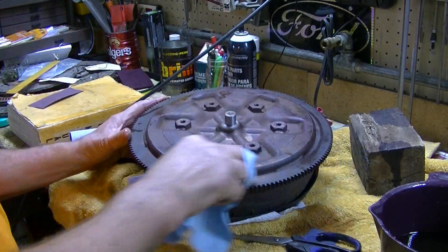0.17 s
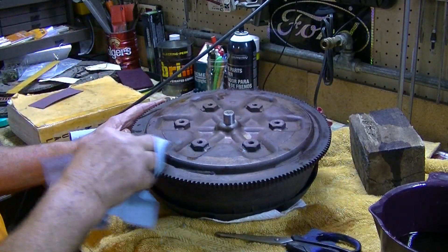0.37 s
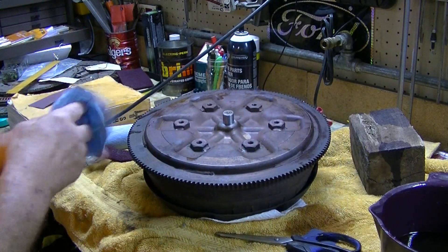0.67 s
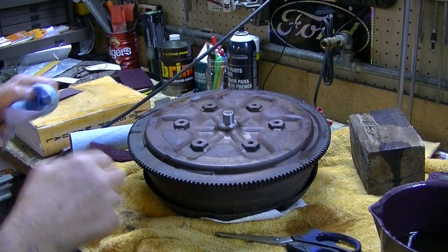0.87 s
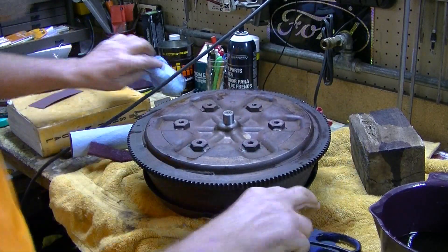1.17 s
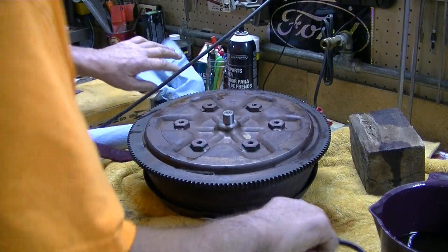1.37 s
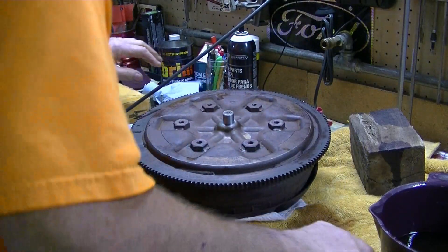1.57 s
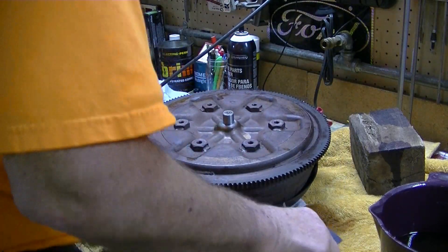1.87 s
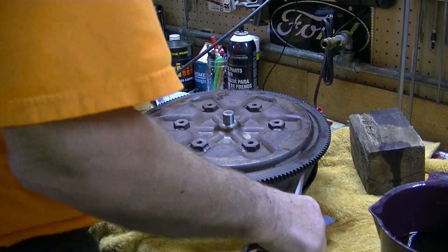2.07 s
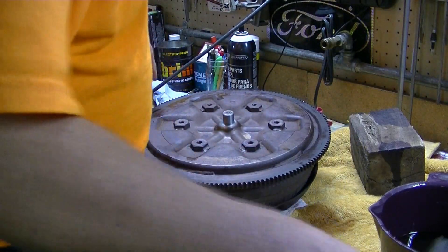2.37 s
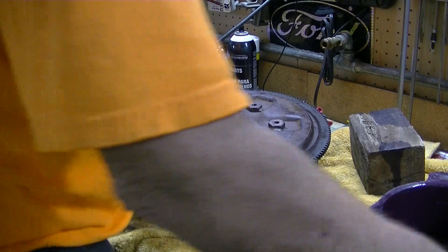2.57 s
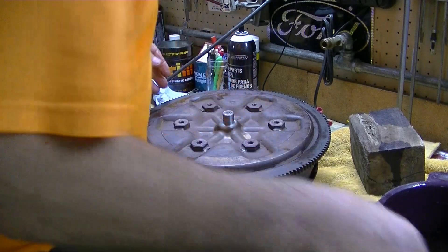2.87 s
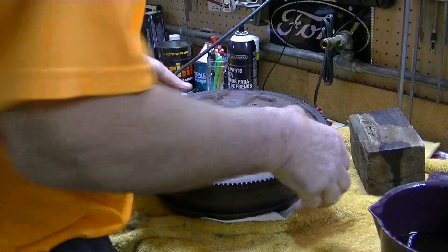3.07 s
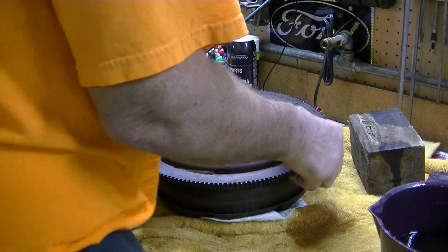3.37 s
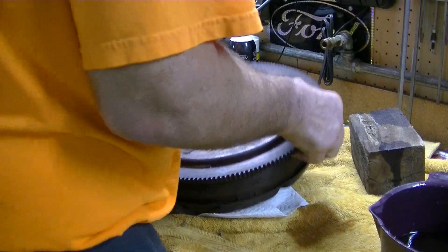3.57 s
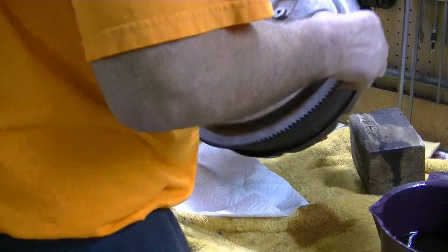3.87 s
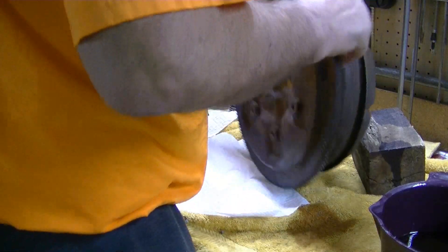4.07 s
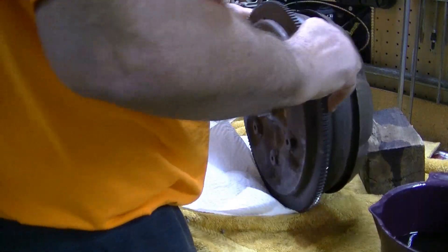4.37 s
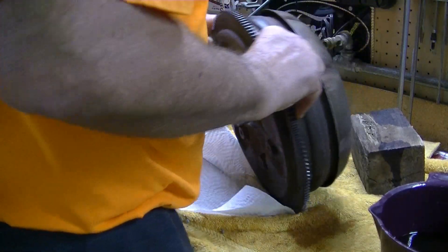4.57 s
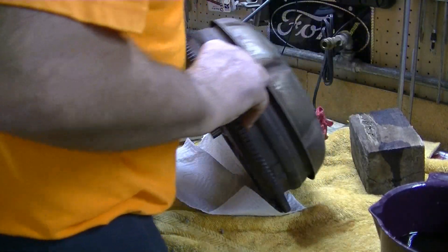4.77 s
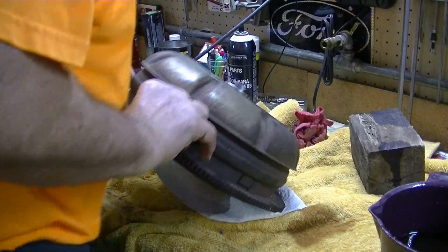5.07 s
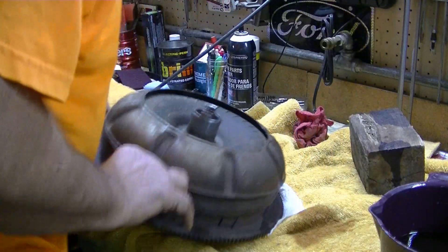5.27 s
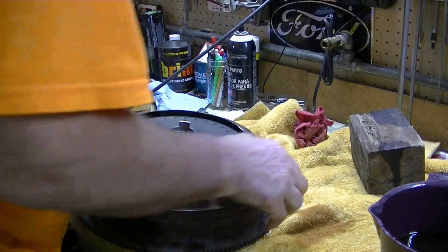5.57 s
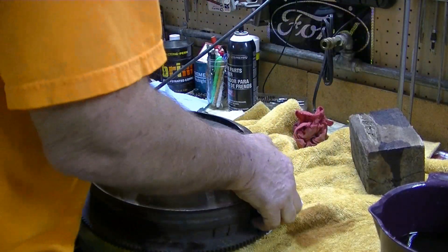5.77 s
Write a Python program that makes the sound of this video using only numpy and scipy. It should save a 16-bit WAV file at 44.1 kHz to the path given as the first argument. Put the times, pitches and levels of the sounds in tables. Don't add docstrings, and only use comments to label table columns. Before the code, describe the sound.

Quiet cloth strokes in a garage, one sharp scissor snip and clatter, then a hard toothed metal clank with rapid rattling and small clinks.

```python
import sys
import numpy as np
from scipy import signal
from scipy.fft import rfft, irfft, next_fast_len
from scipy.io import wavfile
from scipy.ndimage import uniform_filter1d

SR = 44100
rng = np.random.default_rng(int(sys.argv[2]) if len(sys.argv) > 2 else 0)


def to_linear_factor(level_db):
    exponent = np.asarray(level_db, float) / 20
    return 10 ** exponent


def wav_record(signal):
    frames = np.transpose(np.atleast_2d(signal))
    bounded = np.clip(frames, -1, 1)
    quanta = np.round(bounded * 32767).astype(np.int16)
    wavfile.write(sys.argv[1], SR, quanta)


N = 260190

# (frequency [Hz], level [dB], t60 [s])
RIM_MODES = [(2680, -15, .06), (3280, -14, .06), (4090, -2, .06), (4400, -6, .06), (4780, -4, .055),
             (5270, -5, .06), (5920, 0, .06), (6170, -3, .05), (6650, -8, .06), (7400, -15, .05),
             (8050, -17, .04), (9400, -10, .055), (10200, -17, .035), (12150, -20, .03)]
# (frequency [Hz], level [dB], t60 [s])
PLATE_MODES = [(1520, -14, .1), (2270, -8, .09), (2560, -8, .08), (3200, -8, .06), (3700, -7, .06),
               (4450, -1, .06), (5100, -9, .05), (5900, -1, .06), (7360, -9, .05), (8900, -17, .04),
               (10000, -15, .05), (11500, -19, .04), (12500, -19, .04)]
# (frequency [Hz], width [Hz], level [dB])
BENCH_BODY = [(143, 34, 1), (290, 26, 2), (1140, 650, 0)]
# (frequency [Hz], width [Hz], level [dB])
TUB_BODY = [(201, 13, -9.5), (337, 10, -5), (1000, 76, -2), (1340, 170, -8)]
# (time [s], peak level [dB], centre [Hz])
TEETH = [
    (4.3301, -17.5, 4000),
    (4.3728, -10.5, 6300),
    (4.4205, -14.5, 4900),
    (4.4911, -11.5, 5600),
    (4.5485, -21, 4960),
    (4.5836, -24, 4220),
    (4.6147, -22.5, 5800),
    (4.6299, -27.5, 5800),
]


def unit(x):
    return x / np.sqrt(np.mean(x ** 2) + 1e-20)


def along(points, hz):
    f, v = np.transpose(points)
    return np.interp(np.log(hz + 1), np.log(f + 1), v)


def filtered(x, response):
    n = x.shape[-1]
    m = next_fast_len(n + 3000, True)
    return irfft(rfft(x, m) * response(np.fft.rfftfreq(m, 1 / SR)), m)[..., :n]


def thin(x):
    return signal.sosfilt(signal.butter(N=7, Wn=1220, btype="high", fs=SR, output="sos"), x)


def add(track, s, x):
    part = track[..., round(s * SR):][..., :x.shape[-1]]
    part += x[..., :part.shape[-1]]


def spread(pair, alike):
    def turn(hz):
        return np.arccos(np.clip(along(alike, hz), -1, 1)) / 2

    mid, side = filtered(pair, lambda hz: np.array([np.cos(turn(hz)), np.sin(turn(hz))]))
    return np.array([mid + side, mid - side])


def attack(t, rise):
    return 1 - np.exp(-t / rise)


def peak(f, hz, width):
    return 1j * f * width / (hz * hz - f * f + 1j * f * width)


def resonator(modes, db=0, detune=1):
    centre, level, life = np.transpose(modes)[:, :, None]
    width = np.log(1000) / np.pi / life
    return lambda f: np.sum(to_linear_factor(level + db) * peak(f, centre * detune, width) * 500 / width, 0)


def ring(modes, t, spread_db):
    hz, db, t60 = np.transpose(modes)[:, :, None]
    size, phase = rng.standard_normal((2, len(modes), 1))
    decay = to_linear_factor(db + spread_db * size - 60 * t / t60)
    return np.sum(decay * np.sin(2 * np.pi * hz * t + phase), 0) * attack(t, 0.00018)


def scrape(t, hz, t60, tilt_db, rise, modes=(), ring_db=-9, hold=0):
    # (frequency [Hz], density [dB per Hz])
    steel_colour = [(290, -27.5), (500, -24.5), (1400, -17.5), (1550, -8.5), (3490, -6), (3980, -5.5),
                    (5970, -5), (8580, -10.5), (9490, -8), (12300, -17.5), (16000, -56)]
    roughness = unit(uniform_filter1d(rng.standard_normal(len(t)), size=30))
    grit = rng.standard_normal((2, len(t))) * to_linear_factor(2.5 * roughness)
    shape = to_linear_factor(-60 * np.maximum(t - hold, 0) / t60) * attack(t, rise)

    def lean(f):
        return to_linear_factor(tilt_db * np.log2((f + 300) / 5000)) * (1 + 2.46 * peak(f, hz, 0.6 * hz))

    burst = unit(filtered(grit, lambda f: to_linear_factor(along(steel_colour, f)) * lean(f))) * shape
    if not len(modes):
        return burst
    size, shift, split = rng.standard_normal((3, len(modes), 1))
    first = resonator(modes, 2 * size, 1 + 0.005 * shift)
    second = resonator(modes, 2 * size, 1 + 0.005 * shift + 0.012 * split)
    return burst + to_linear_factor(ring_db) * filtered(grit * shape, lambda f: (first(f) + second(f)) * lean(f))


def blows(events, modes, stand, rise, ring_db, tilt_db, thud_db, hold=0):
    sound, knocks, t = np.zeros((2, N)), np.zeros(N), np.arange(SR // 6) / SR
    for s, db, hz, t60 in events:
        blunt = np.log2(4500 / hz)
        burst = scrape(t, hz, t60, tilt_db - 0.5 * blunt, rise, modes, ring_db, hold)
        add(sound, s, to_linear_factor(db - 8.5) * burst)
        add(knocks, s, to_linear_factor(db + thud_db + 10.5 * max(blunt, 0)) * np.hanning(16))

    def body(f):
        return sum((-1) ** k * to_linear_factor(db) * peak(f, hz, width) for k, (hz, width, db) in enumerate(stand))

    sound[0] += filtered(knocks, body)
    return sound


def rustle(patchy_db, grain_db):
    # (frequency [Hz], density [dB per Hz])
    cloth_colour = [(410, -57), (700, -23), (1250, -19), (1400, -14.5), (1500, -16), (1750, -10.5),
                    (1940, -11.5), (3320, -6.5), (4150, -2), (5920, 0.5), (7990, -17), (9350, -23.5),
                    (16000, -46)]
    # (time [s], level [dB], crispness [dB])
    movement = [(0, -40.5, 0), (.33, -42.5, 4.5), (0.479, -41.5, -0.5), (.565, -69.5, 0), (.68, -50, -5),
                (.8, -46, -4.5), (1.25, -53.5, -7.5), (1.5, -49.5, -3), (1.9, -57.5, 0), (2.13, -60, 0.5),
                (2.42, -67.5, -5), (2.93, -70, -0.5), (3.46, -58, -3.5), (4.09, -64.5, 3.5),
                (4.7, -49, -15.5), (5.05, -56, -5), (5.63, -61, -9), (5.9, -53, -8)]
    # (time of peak [s], level [dB], time to rise 10 dB [ms], time to fall 10 dB [ms])
    strokes = [(.432, -38.5, 102, 39), (.72, -42.5, 37, 31), (.82, -43.5, 39, 33), (.91, -42.5, 19, 67),
               (1.048, -43.5, 65, 12), (1.409, -38.5, 71, 21), (1.5, -43.5, 45, 130), (1.622, -42.5, 5, 57),
               (1.728, -45, 13, 9), (1.8, -46.5, 12, 71), (1.93, -49, 19, 42), (1.99, -46, 15, 35),
               (2.068, -49, -2, 56), (2.101, -40, 28, 27), (2.373, -53, 95, 12), (2.452, -48.5, 8, 8),
               (2.48, -51, 10, 16), (2.53, -51, 22, 45), (2.618, -35.5, 4.5, 80), (2.685, -41, 45, 31),
               (4.031, -47, 19, 77), (4.089, -39, 78, 105), (4.226, -43.5, 19, 30), (4.848, -47, 100, 32),
               (5.219, -46.5, 67, 129), (5.384, -42, 35, 33), (5.521, -48.5, 14, 37), (5.798, -45, 59, 152)]
    # (time [s], share [0-1])
    grind = [
        (4.66, .04),
        (4.76, .08),
        (4.95, .03),
        (5.2, .06),
        (5.5, .1),
        (5.9, .25),
    ]
    s, db, treble_db = np.transpose(movement)
    t = np.arange(N) / SR
    power = to_linear_factor(2 * np.interp(t, s, db))
    for at, level_db, rise, fall in strokes:
        away = np.maximum((at - t) / abs(rise), (t - at) / abs(fall)) * 1000
        power += to_linear_factor(2 * level_db - 20 * away)

    z = signal.stft(rng.standard_normal((2, N)), nperseg=256)[2]
    field = uniform_filter1d(rng.standard_normal(z.shape[1:]), size=5, axis=0)
    field = uniform_filter1d(field, size=9, axis=1)
    noise = signal.istft(z * to_linear_factor(patchy_db * unit(field)), nperseg=256)[1][:, :N]
    quick_slips = unit(uniform_filter1d(rng.standard_normal(N), size=60))
    slow_slips = unit(uniform_filter1d(rng.standard_normal(N), size=600))
    noise = noise * to_linear_factor(grain_db * (quick_slips + 1.9 * slow_slips))

    steel = np.clip(np.interp(t, *np.transpose(grind), left=0), 0, 1)
    cloth = unit(filtered(noise, lambda f: to_linear_factor(along(cloth_colour, f))))
    metal = unit(filtered(noise, resonator(PLATE_MODES)))
    rub = np.sqrt(1 - steel) * cloth + np.sqrt(steel) * metal
    top = filtered(rub, lambda f: 1 / (1 + (8200 / (f + 1)) ** 8))
    crisp = to_linear_factor(np.interp(t, s, treble_db) + 16.5)
    return np.sqrt(power) * (rub - top + crisp * top)


def port_hiss():
    # (frequency [Hz], density [dB per Hz])
    hiss_colour = [(15, -50), (25, -11), (97, -2.5), (134, 1), (312, 2), (387, -1.5), (551, -5.5),
                   (648, -9), (1090, -12), (2200, -5), (2960, -5), (5240, -10.5), (14700, -17.5),
                   (16400, -22)]
    # (frequency [Hz], left-right likeness [-1 to 1])
    hiss_alike = [(60, -0.41), (130, -0.42), (290, -0.58), (640, -0.29), (1410, -0.14), (3100, -0.097),
                  (6820, -0.16), (15000, 0.046)]
    noise = filtered(rng.standard_normal((2, N)), lambda f: to_linear_factor(along(hiss_colour, f)))
    return to_linear_factor(-57.5) * unit(spread(noise, hiss_alike))


def soften(x):
    return filtered(x, lambda f: 1 / (1 + 1j * f / 13000 - (f / 9500) ** 2))


def creases():
    # (time [s], peak level [dB], centre [Hz])
    crackles = [(0.208, -30, 3030), (0.4035, -32, 4830), (0.425, -41, 5910), (0.572, -43, 2760),
                (0.682, -31, 9500), (0.922, -34.5, 4340), (1.4075, -28.5, 5730), (1.4998, -37, 4490),
                (1.6152, -31.5, 6000), (1.7273, -27.5, 3970), (1.794, -40, 6350), (2.3648, -35, 5430),
                (2.514, -37, 4060), (2.6183, -54, 5980), (2.6438, -24.5, 5000), (3.255, -39, 6400),
                (3.5992, -37.5, 6000)]
    sound, t = np.zeros((2, N)), np.arange(SR // 20) / SR
    for s, db, hz in crackles:
        add(sound, s, to_linear_factor(db - 7.5) * scrape(t, hz, t60=0.039, tilt_db=-2.5, rise=0.00054))
    return thin(soften(sound))


def hard_clicks():
    # (time [s], peak level [dB], centre [Hz])
    cracks = [(0.3538, -16.5, 5470), (1.9722, -28, 5000), (1.983, -30, 6000), (2.0636, -31, 6550),
              (2.0952, -23, 7000), (2.1009, -29, 7000), (2.1047, -28, 7600), (2.1713, -4, 5150),
              (3.442, -42, 6000), (1.7266, -30, 4500), (2.7432, -15, 5740), (2.7583, -6.5, 6330),
              (2.83, -3.5, 5870), (2.8463, -10, 5400), (2.884, -16, 5400), (4.2396, -5.5, 4500),
              (4.2402, -22, 4500), (4.2634, -3.5, 5800), (5.516, -36, 5030), (5.792, -41, 2500),
              (5.854, -35, 5040)]
    sound, t = np.zeros((2, N)), np.arange(SR // 5) / SR
    for s, db, hz in cracks:
        swing = np.sin(2 * np.pi * hz * t) * to_linear_factor(-60 * t / 0.0012)
        add(sound[0], s, to_linear_factor(db + 10.5) * swing * attack(t, 0.0001))
    return thin(soften(sound))


def focus_motor():
    # (start [s], end [s], first click [dB], tick [dB], thump [dB])
    runs = [
        (1.056, 2.103, -36.5, -42, -56),
        (2.355, 2.6, -86, -57, -74),
        (3.4078, 4.808, -30, -42, -52),
        (5.293, 5.888, -35, -42, -55.5),
    ]
    # (frequency [Hz], level [dB], t60 [s])
    lens_modes = [(1430, 1, 0.014), (1584, -1, 0.018), (1873, 3, 0.013), (2150, -2, 0.042),
                  (2540, 2, 0.0098), (2950, -1, 0.028), (3600, -9, 0.014)]
    # (frequency [Hz], level [dB], t60 [s])
    catch_modes = [(1420, -3, .045), (1570, -7, .015), (1868, -5, .03), (2010, -10, .03), (2650, 3, .018),
                   (3050, 1, .014), (3700, -11, .02), (4100, -15, .012)]
    # (frequency [Hz], level [dB], t60 [s])
    step_modes = [(1500, 0, .014), (1880, -12, .02), (2600, -4, .012), (3120, -9, .012)]
    frame_rate = 29.97
    ticks, thumps, t = np.zeros(N), np.zeros(N), np.arange(SR // 20) / SR
    whir = unit(filtered(rng.standard_normal(N), resonator(lens_modes)))
    for start, end, click_db, tick_db, thump_db in runs:
        add(ticks, start, to_linear_factor(click_db) * ring(catch_modes, t, spread_db=1) * attack(t, 0.0006))
        add(ticks, start, to_linear_factor(tick_db - 18) * whir[round(start * SR):round(end * SR)])
        for s in np.arange(start, end, 1 / frame_rate)[1:]:
            step = 1.5 * ring(step_modes, t, spread_db=1.5) * attack(t, 0.002)
            add(ticks, s + 0.0018 + rng.normal(0, 0.0004), to_linear_factor(tick_db + rng.normal(-1, 2.5)) * step)
            pitch_hz = 250 * np.exp(0.1 * rng.standard_normal())
            thump = np.sin(2 * np.pi * pitch_hz * t) * np.exp(-((t - 0.005) / 0.0025) ** 2)
            level_db = thump_db + np.clip(rng.normal(0, 3.2), -8, 3) - 0.5
            add(thumps, s + 0.0047 + rng.normal(0, 0.00048), to_linear_factor(level_db) * thump)
    return thin(ticks) + thumps


def scissors_picked_up():
    # (time [s], peak level [dB], centre [Hz], t60 [s])
    chatter = [
        (1.9718, -20, 4500, 0.0095),
        (1.9818, -27, 6500, 0.01),
        (1.992, -44, 5900, 0.025),
        (2.0632, -15.5, 6800, 0.0063),
        (2.077, -28, 4200, 0.036),
        (2.0835, -24, 7200, 0.016),
        (2.0945, -29, 7200, .012),
        (2.1007, -22, 7000, 0.012),
        (2.1035, -25.5, 4500, 0.02),
        (2.139, -31, 4400, 0.022),
    ]
    # (frequency [Hz], level [dB], t60 [s])
    loose_modes = [(3700, -2, .02), (4500, -3.5, 0.054), (5800, -14, .04), (7200, 5.5, 0.027),
                   (9030, -2.5, 0.034)]
    return thin(blows(chatter, loose_modes, TUB_BODY, rise=0.00021, ring_db=-12.5, tilt_db=-3.5, thud_db=-60))


def scissors_close():
    # (time [s], peak level [dB], grit t60 [s], ring level [dB])
    snips = [
        (2.171, -3, .022, -23.5),
    ]
    # (frequency [Hz], level [dB], t60 [s])
    blade_modes = [(1332, -23, .2), (2192, -18, .22), (2456, -18, .15), (3284, -4, .12), (3671, -8, .12),
                   (4511, -1, .1), (5401, -1, .12), (5641, -8, .12), (6401, -8, .08), (7501, -7, .05),
                   (8771, -13, .06)]
    sound, t = np.zeros((2, N)), np.arange(SR // 5) / SR
    for s, db, t60, ring_db in snips:
        other = ring(np.multiply(blade_modes, [1.011, 1, 1]), t, spread_db=2)
        blades = ring(blade_modes, t, spread_db=0) + 0.4 * other
        add(sound, s, to_linear_factor(db - 19) * scrape(t, 4500, t60, tilt_db=0.1, rise=0.001))
        add(sound[0], s, to_linear_factor(db + ring_db) * blades * attack(t, 0.002))
    return thin(sound)


def scissors_in_tub():
    # (time [s], peak level [dB], centre [Hz], t60 [s])
    bumps = [
        (2.6833, -10, 1300, 0.047),
        (2.695, -29, 805, 0.036),
        (2.814, -16.5, 1000, 0.059),
        (2.83, -28, 1000, 0.036),
    ]
    # (time [s], peak level [dB], centre [Hz], t60 [s])
    hits = [(2.7417, -19.5, 4260, 0.029), (2.75, -14, 5000, 0.053), (2.7535, -11, 6000, 0.044),
            (2.7563, -1, 4230, 0.031), (2.7639, -10, 3700, 0.045), (2.7685, -14.5, 4143, 0.18),
            (2.779, -24, 4000, 0.075), (2.7935, -20, 2800, 0.033), (2.7995, -11, 4200, 0.057),
            (2.8114, -13.5, 4130, 0.029), (2.8198, -21, 4400, 0.026), (2.8288, -4.5, 5800, 0.022),
            (2.8325, -8, 5000, .02), (2.8385, -21, 5000, 0.042), (2.843, -8, 5300, 0.024),
            (2.8465, -10, 5160, 0.031), (2.8515, -15, 5000, 0.036), (2.8645, -24, 5160, 0.037),
            (2.8833, -22, 5240, 0.062), (2.8988, -43, 5900, 0.11)]
    # (frequency [Hz], level [dB], t60 [s])
    clatter_modes = [(1880, -6.5, 0.064), (2700, 3.5, 0.025), (3986, 7, 0.025), (4970, -2, 0.045),
                     (5730, 6, 0.019), (6330, 5.5, 0.013), (7200, -17, .04), (9100, -11, 0.069)]
    handle = blows(bumps, clatter_modes, TUB_BODY, rise=0.00067, ring_db=-43, tilt_db=-1, thud_db=-13)
    clatter = blows(hits, clatter_modes, TUB_BODY, rise=0.00028, ring_db=-20.5, tilt_db=0, thud_db=-28)
    return clatter + filtered(handle, lambda f: 1 / (1 + 1j * f / 2200) ** 2)


def rim_lands():
    # (time [s], peak level [dB], centre [Hz], t60 [s])
    landing = [(4.2134, -28, 4000, .04), (4.2322, -11, 4970, 0.05), (4.2373, -2.5, 3620, 0.04),
               (4.2405, -8.5, 3600, 0.043), (4.2498, -14, 4800, 0.1), (4.2585, -12, 6150, 0.054),
               (4.2612, -13, 6170, 0.14), (4.2632, -0.5, 6100, 0.03), (4.27, -16, 3000, 0.045),
               (4.2887, -10.5, 5440, 0.064), (4.2985, -14, 5600, 0.035), (4.3075, -13, 4680, 0.04),
               (4.3188, -20, 6500, 0.061), (4.3385, -19.5, 4100, 0.062), (4.3475, -26, 4100, 0.041),
               (4.3957, -23, 5800, 0.12), (4.4048, -21, 5640, .08), (4.4175, -17, 4900, 0.04),
               (4.424, -20, 2010, 0.091), (4.442, -23, 5740, 0.058), (4.4505, -24, 5700, 0.23)]
    return blows(landing, RIM_MODES, BENCH_BODY, rise=0.00047, ring_db=-31, tilt_db=-3.5, thud_db=-11)


def lingering_tones():
    # (time [s], frequency [Hz], level [dB], t60 [s])
    boom = [
        (4.222, 62.4, -38, 0.32),
        (4.242, 83, -49, 0.71),
        (4.372, 74.3, -53, 0.55),
        (4.751, 69, -67, 0.91),
    ]
    # (time [s], frequency [Hz], level [dB], t60 [s])
    hum = [(4.331, 4100, -27, .09), (4.332, 2680, -33, .07), (4.44, 2650, -38, .1), (5.145, 1691, -59, .61),
           (5.379, 1691, -43, .5), (5.516, 3700, -48, .15), (5.378, 4400, -45, .12), (5.38, 6200, -44, .1),
           (5.2, 9300, -60, .4), (5.17, 7250, -58, .2), (5.8, 9200, -52, .08), (5.75, 4200, -50, .1),
           (5.559, 2400, -41, .07), (5.559, 4150, -38, .08), (5.559, 4650, -38, .06),
           (4.775, 3150, -57, .6), (4.78, 5400, -52, .1), (4.845, 4500, -52, .1), (5.615, 4450, -31, .12),
           (5.617, 5950, -32, .1), (5.625, 4600, -36, .08), (5.655, 4550, -42, .1), (5.636, 2100, -45, .2),
           (5.795, 2281, -46, .2), (5.797, 2450, -47, .12), (5.8, 2100, -48, .08), (5.805, 4250, -43, .16),
           (5.81, 3200, -48, .12), (5.815, 1521, -50, .3), (5.848, 1521, -47, .61), (5.847, 2561, -33, .16),
           (5.855, 3200, -44, .08), (5.851, 9951, -53, .31)]
    sound, t = np.zeros(N), np.arange(SR // 2) / SR
    for s, hz, db, t60 in hum + boom:
        pair = ring([(hz, db, t60), (hz * 1.012, db - 14, t60)], t, spread_db=0)
        add(sound, s, pair * attack(t, 0.004))
    return sound


def rim_rocks():
    events = [(*row, 0.036) for row in TEETH]
    return blows(events, RIM_MODES, BENCH_BODY, rise=0.00043, ring_db=-16, tilt_db=0, thud_db=-31, hold=0.006)


def rim_rings():
    sound, t = np.zeros(N), np.arange(SR // 2) / SR
    for s, db, hz in TEETH:
        modes = np.multiply(RIM_MODES, [1 + rng.normal(0, 0.006), 1, 1.5])
        add(sound, s, to_linear_factor(db - 12) * ring(modes, t, spread_db=3.5) * attack(t, 0.001))
    return sound


def plate_shifts():
    # (time [s], peak level [dB], centre [Hz], t60 [s])
    shifts = [(4.7784, -34.5, 5500, 0.035), (4.8494, -35, 5420, 0.044), (5.2096, -53, 5740, 0.023),
              (5.37, -51, 6200, 0.036), (5.3773, -30, 5700, 0.056), (5.5163, -37.5, 4500, 0.035),
              (5.5592, -24.5, 4550, 0.015), (5.565, -29, 2380, 0.015), (5.748, -37.5, 4400, 0.045),
              (5.7602, -36, 4800, 0.051), (5.8135, -32, 4500, 0.038), (5.8278, -32, 2200, 0.049),
              (5.7928, -39.5, 2320, 0.18), (5.7985, -33, 4400, 0.026), (5.8036, -24.5, 4830, 0.026),
              (5.8445, -27, 5000, 0.025), (5.8483, -28.5, 5530, 0.078)]
    return blows(shifts, PLATE_MODES, TUB_BODY, rise=0.0019, ring_db=-9, tilt_db=0, thud_db=-29)


def plate_seats():
    # (time [s], peak level [dB], centre [Hz], t60 [s])
    drops = [
        (5.6036, -51, 2460, .03),
        (5.6151, -21, 4500, 0.02),
        (5.6172, -23, 5800, 0.093),
        (5.6257, -14.5, 4900, 0.01),
        (5.6334, -38, 2080, 0.18),
        (5.6557, -31.5, 6560, 0.087),
    ]
    return blows(drops, PLATE_MODES, BENCH_BODY, rise=0.0016, ring_db=-15.5, tilt_db=4, thud_db=-9.5)


def garage(x):
    # (frequency [Hz], t60 [s])
    room_t60 = [(300, 0.37), (3000, 0.24), (12000, 0.19)]
    wet, step = np.zeros((2, N + SR)), SR // 3
    for at in range(0, N, step):
        hz, t, z = signal.stft(rng.standard_normal((2, SR // 2)), SR, nperseg=256)
        decay = to_linear_factor(-60 * t / along(room_t60, hz)[:, None])
        tail = signal.istft(z * decay, SR, nperseg=256)[1]
        echo = signal.fftconvolve(x[None, at:at + step], tail / np.linalg.norm(tail[0]), axes=1)
        first = at + 130
        wet[:, first:first + echo.shape[1]] += echo
    return wet[:, :N]


def scene():
    # (frequency [Hz], left-right likeness [-1 to 1])
    near_alike = [(60, 0.78), (99, 0.722), (160, 0.29), (270, 0.2), (450, 0.9), (740, 0.62), (1220, 0.5),
                  (2010, 1), (3330, 0.82), (5500, 0.95), (9080, 0.2), (15000, 0.028)]
    # (frequency [Hz], left minus right [dB])
    port_balance = [(60, -2), (95, -1), (150, 2), (240, -5.5), (380, 0), (600, -4.5), (950, -4),
                    (1500, -1.5), (2380, -6), (3770, -2.5), (5980, -1.5), (9470, -7.5), (15000, 5)]
    cloth = rustle(patchy_db=1.5, grain_db=0.46)
    near = creases() + hard_clicks()
    near += scissors_picked_up() + scissors_close() + scissors_in_tub()
    near += rim_lands() + rim_rocks()
    near += plate_shifts() + plate_seats()
    tones = lingering_tones() + rim_rings()
    room = to_linear_factor(-9.5) * spread(garage(near[0] + 0.2 * tones), near_alike)
    bench = spread(near + cloth, near_alike) + tones + room
    bench += focus_motor() * to_linear_factor([[-1.5], [1.5]])

    def ports(f):
        half_db = 0.5 * along(port_balance, f)
        return to_linear_factor([half_db, -half_db]) / (1 + (f / 15600) ** 40)

    return filtered(bench, ports) + port_hiss()


def roll_off(x):
    return signal.sosfilt(signal.butter(12, 16520, fs=SR, output="sos"), x)


def record(dry):
    limited = dry / (1 + np.abs(dry / 1.5) ** 4) ** (1 / 4)
    return roll_off(limited)


dry = scene()
out = record(dry)
wav_record(out)
```